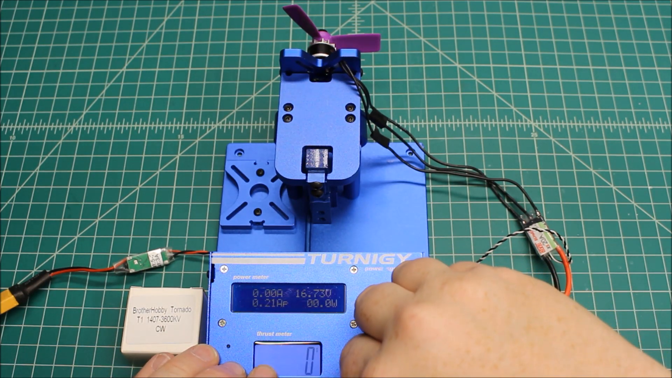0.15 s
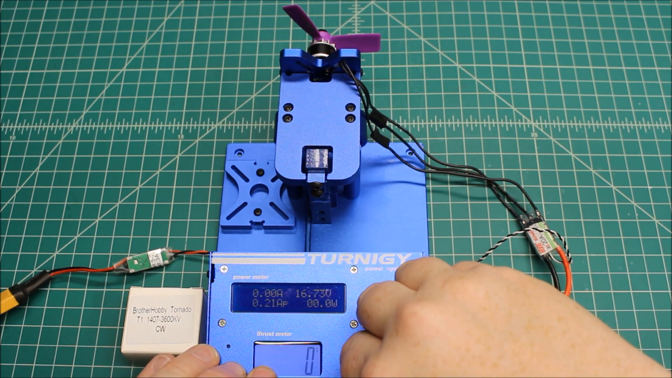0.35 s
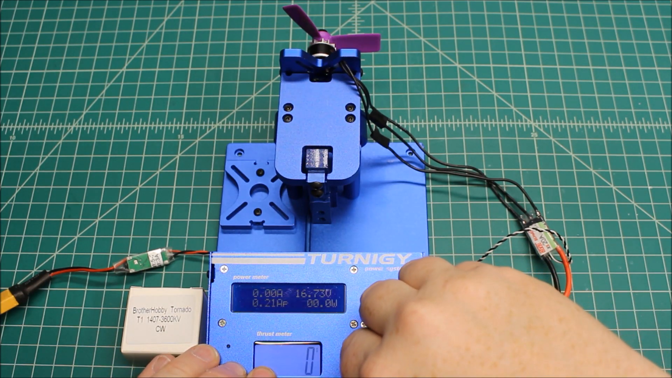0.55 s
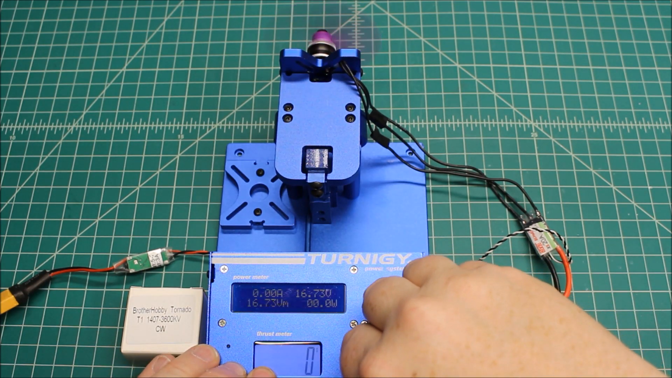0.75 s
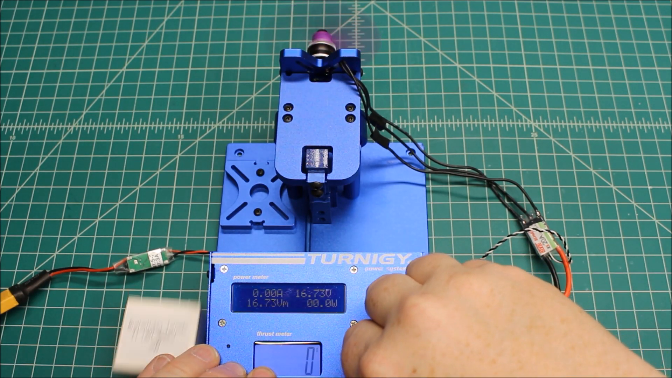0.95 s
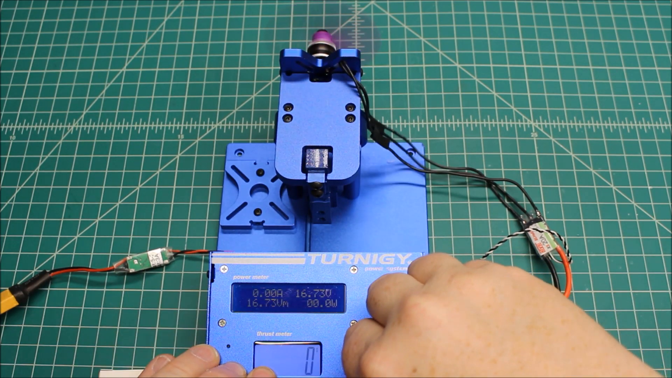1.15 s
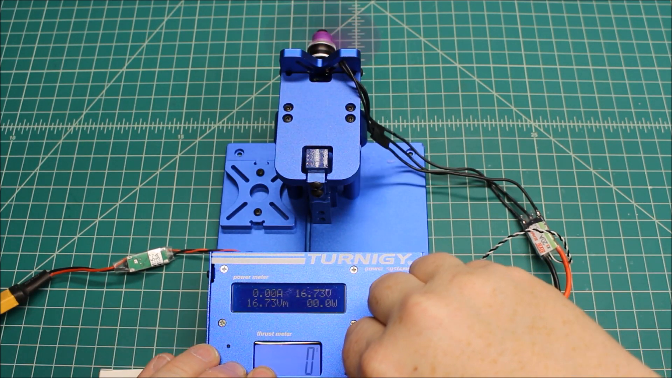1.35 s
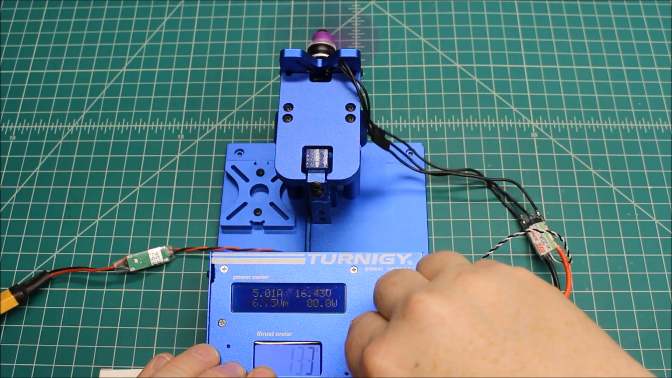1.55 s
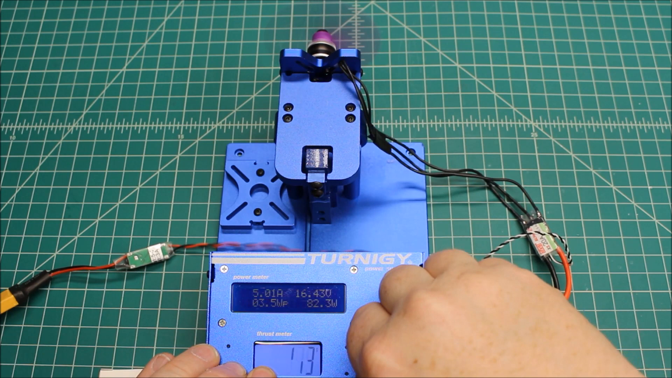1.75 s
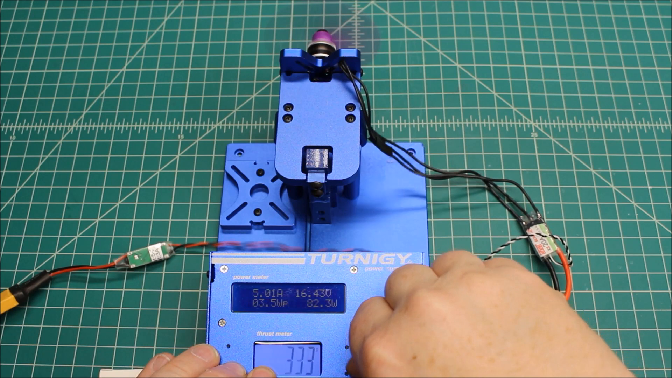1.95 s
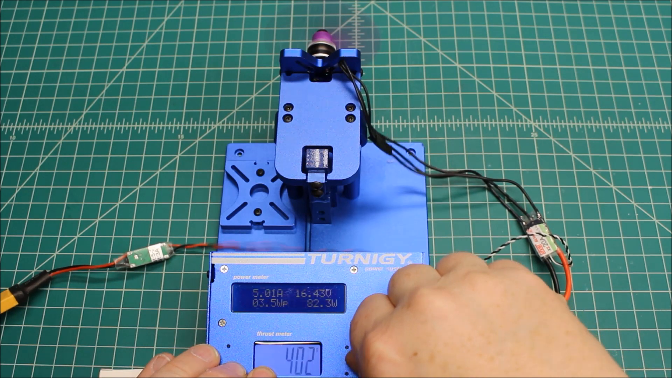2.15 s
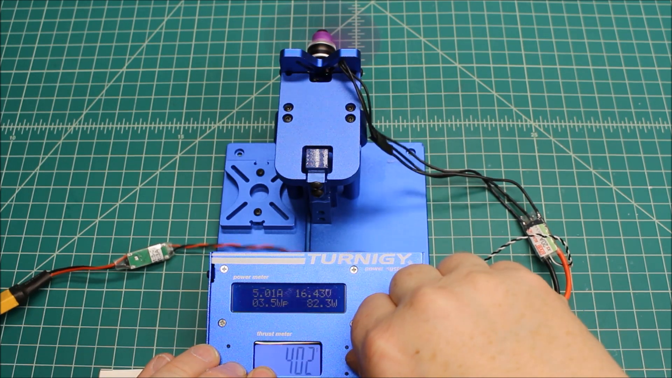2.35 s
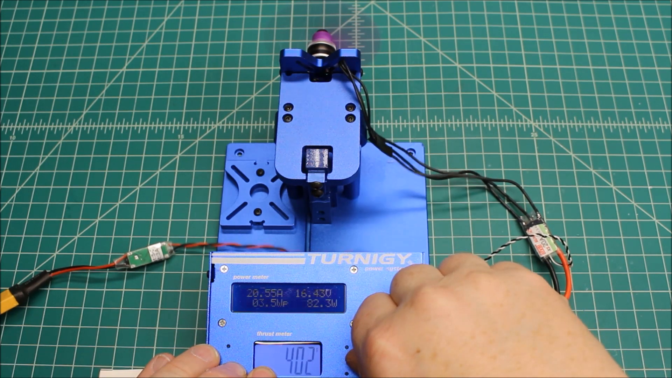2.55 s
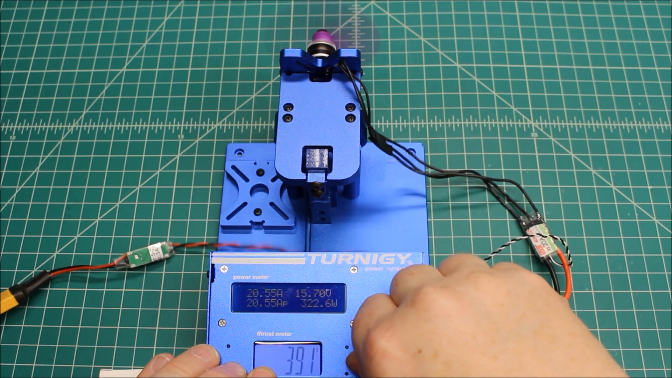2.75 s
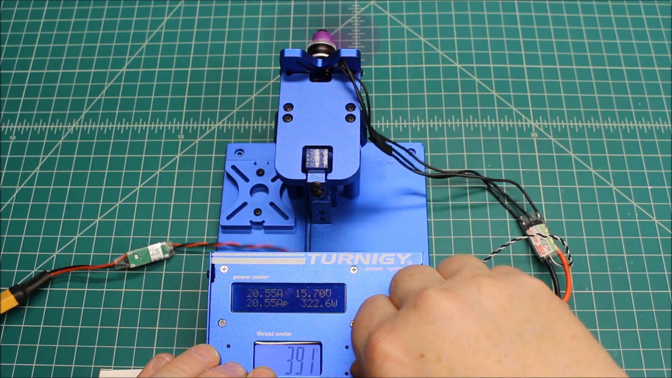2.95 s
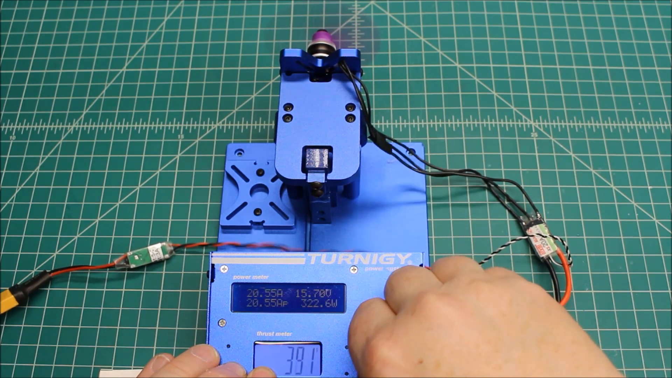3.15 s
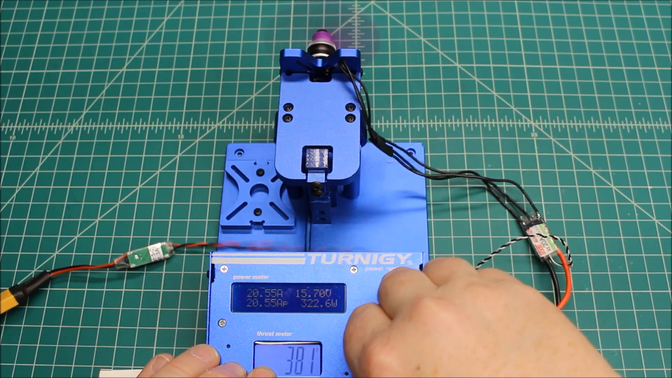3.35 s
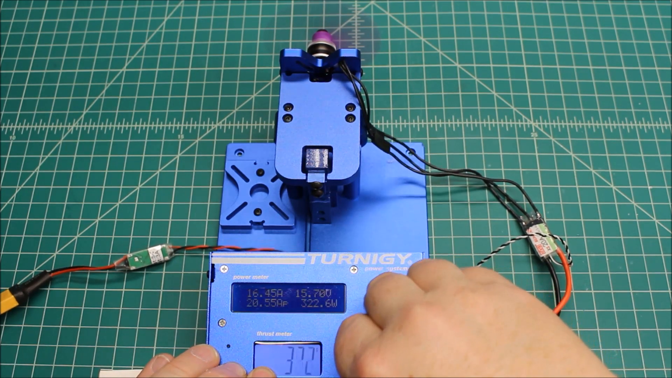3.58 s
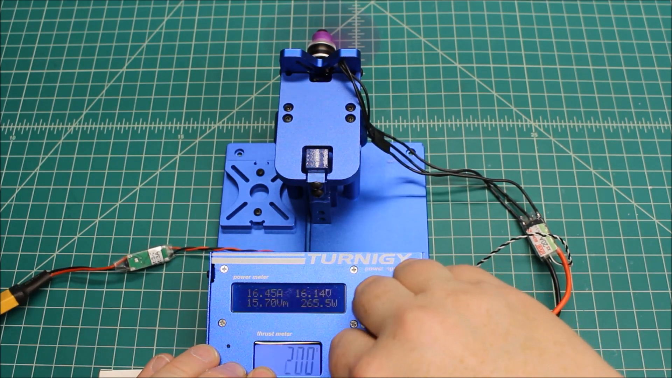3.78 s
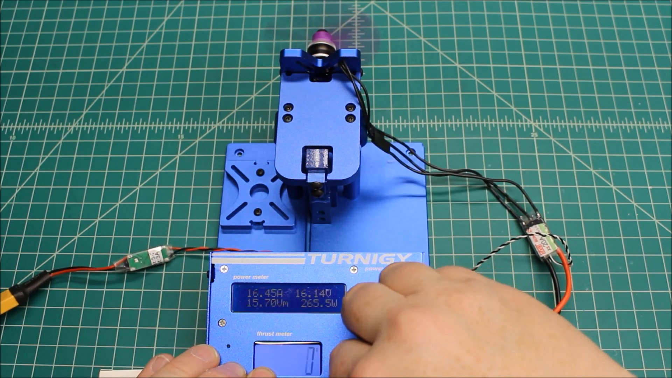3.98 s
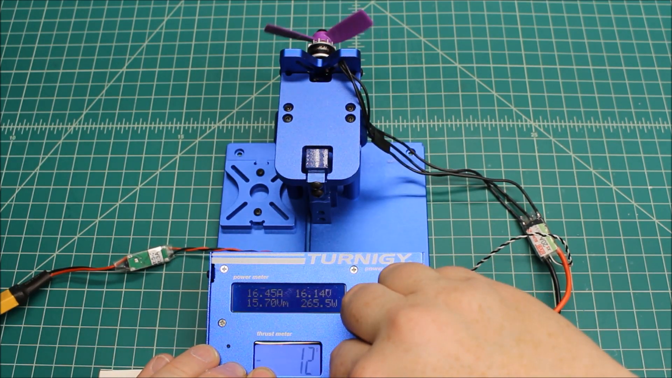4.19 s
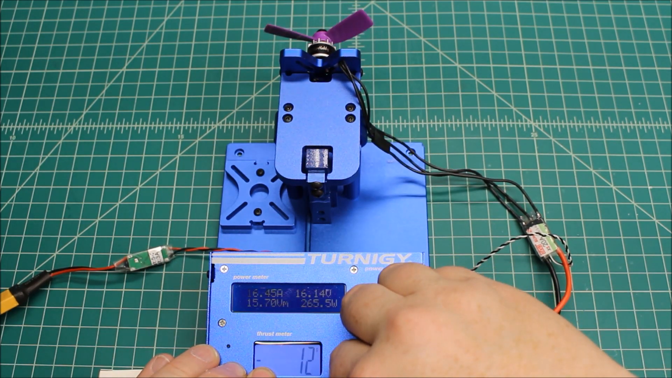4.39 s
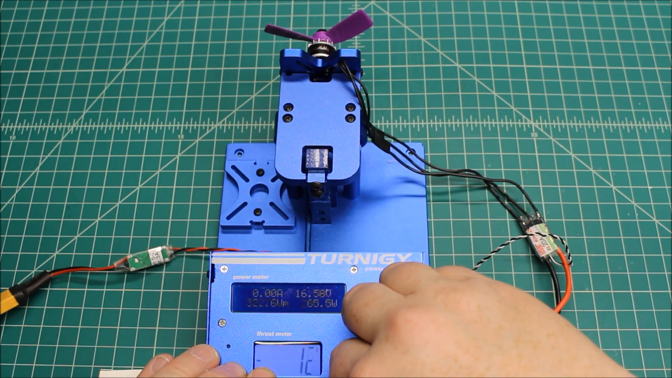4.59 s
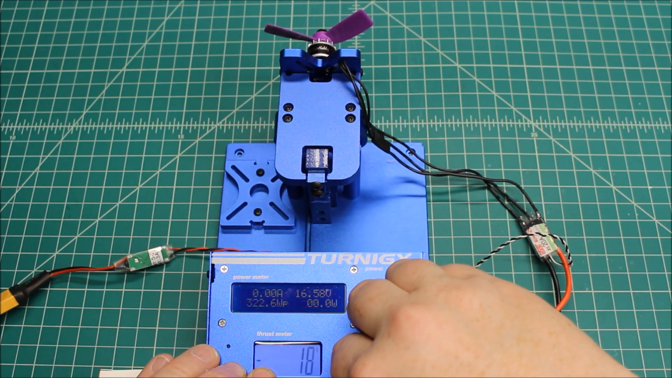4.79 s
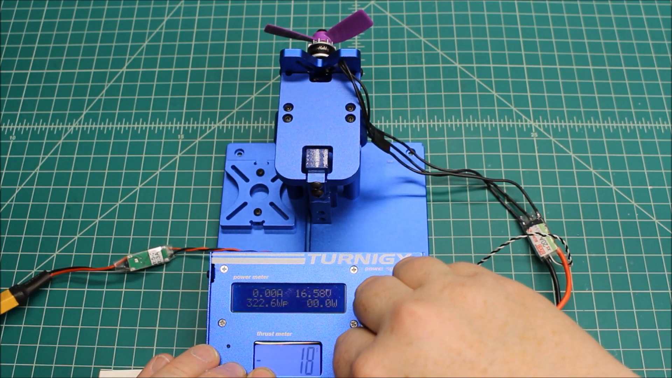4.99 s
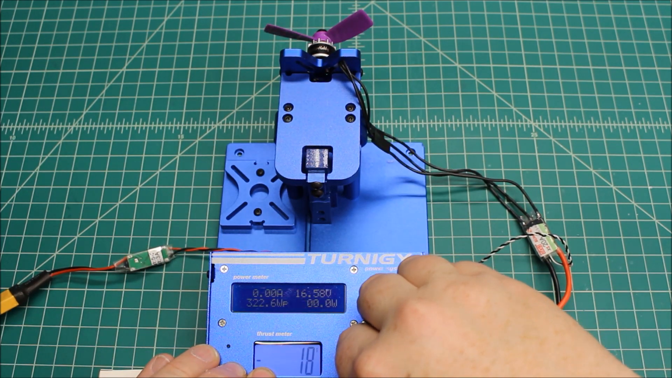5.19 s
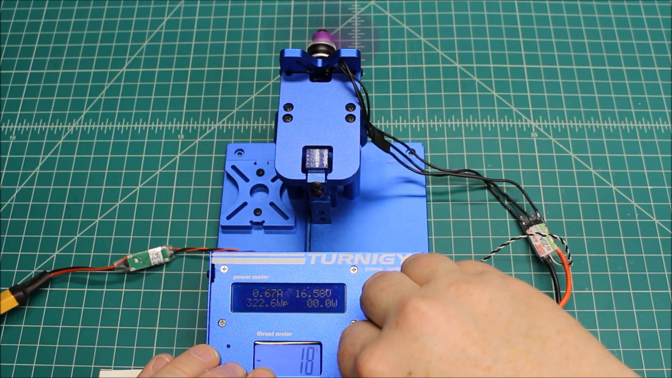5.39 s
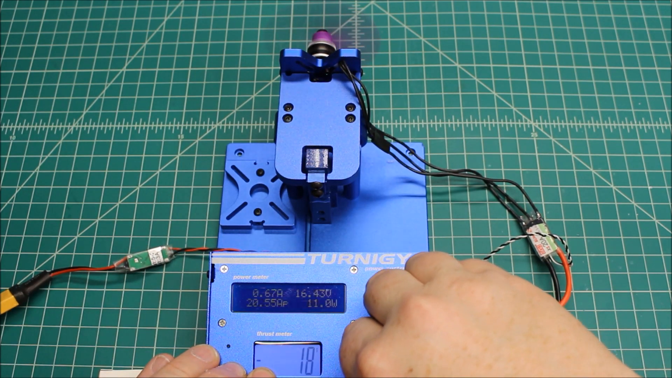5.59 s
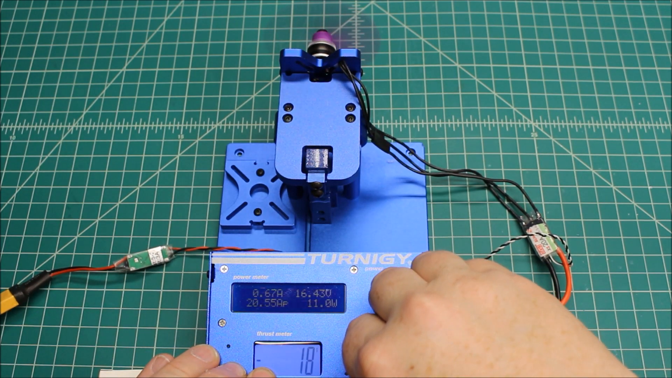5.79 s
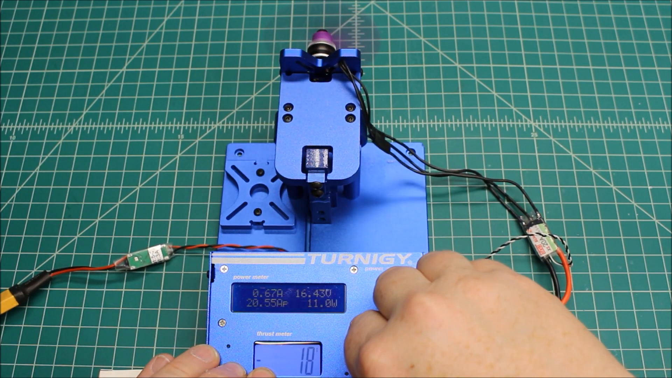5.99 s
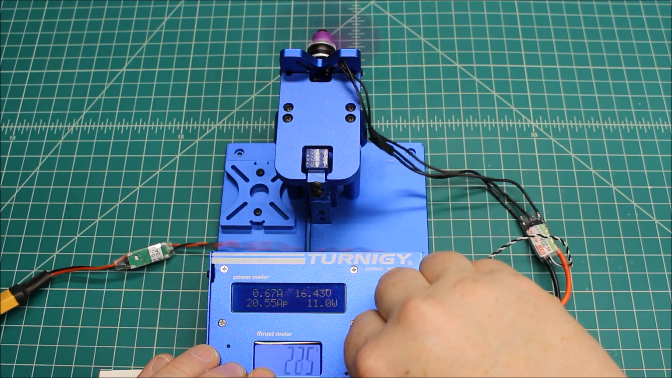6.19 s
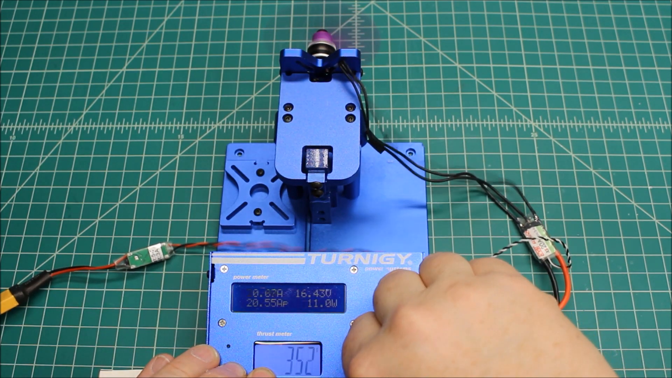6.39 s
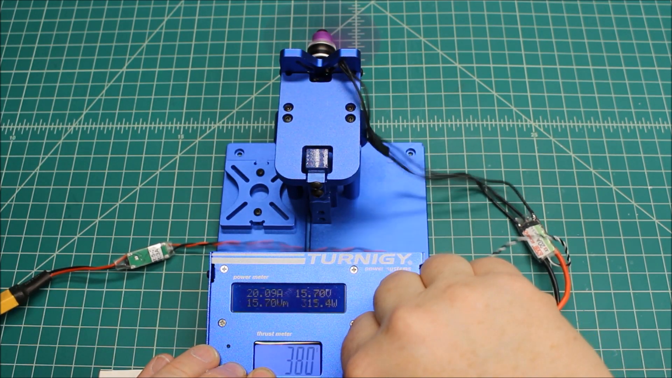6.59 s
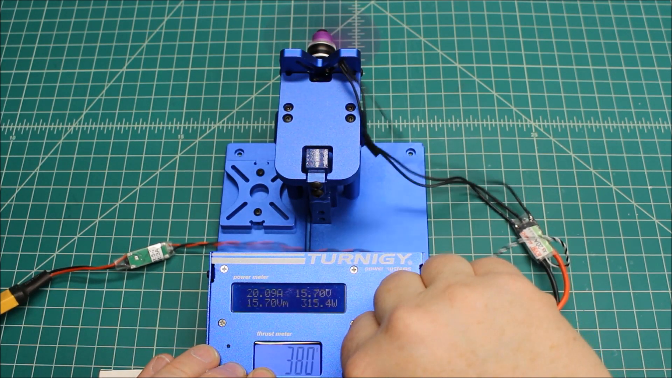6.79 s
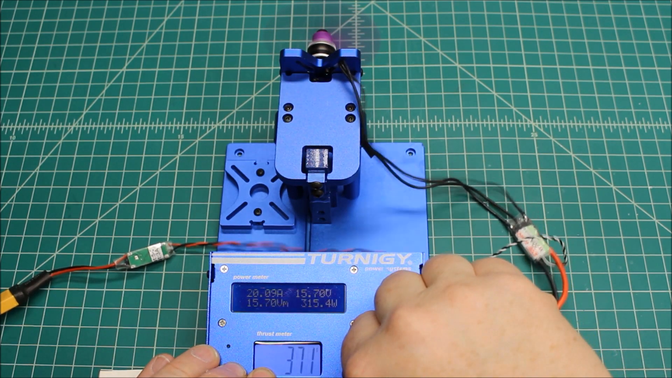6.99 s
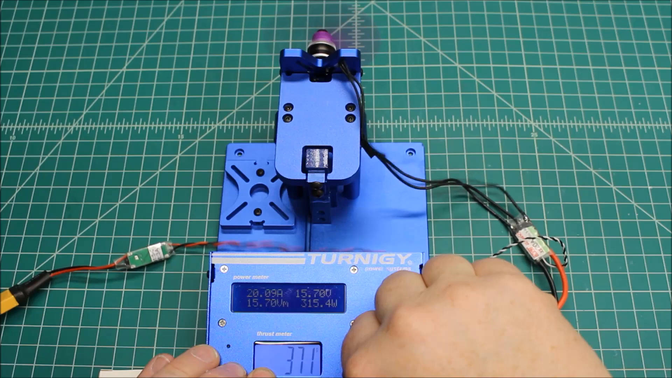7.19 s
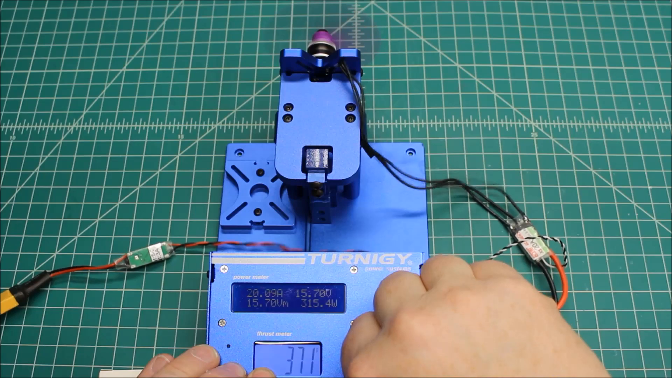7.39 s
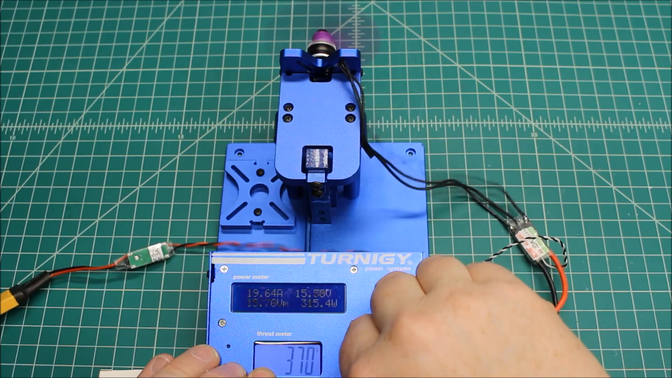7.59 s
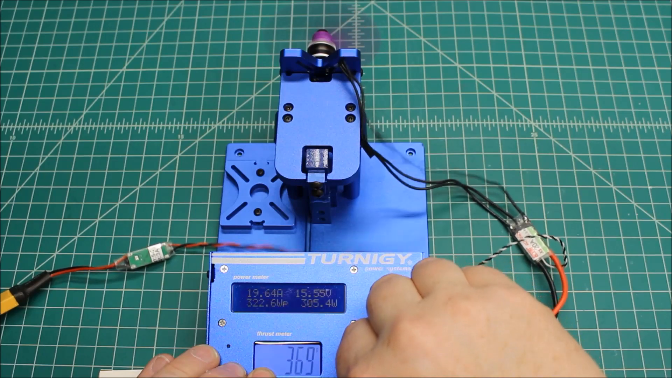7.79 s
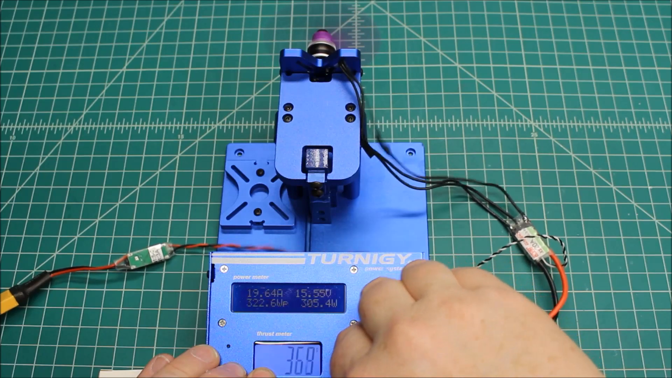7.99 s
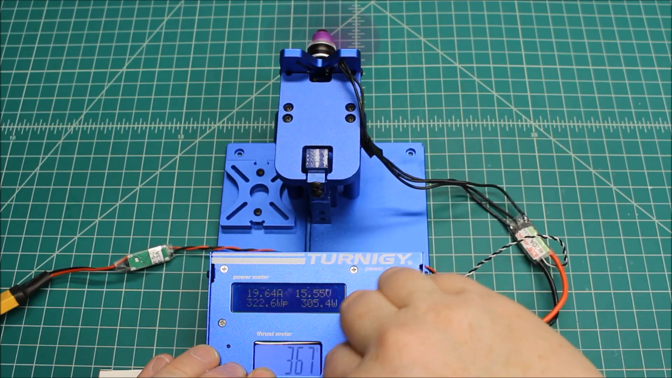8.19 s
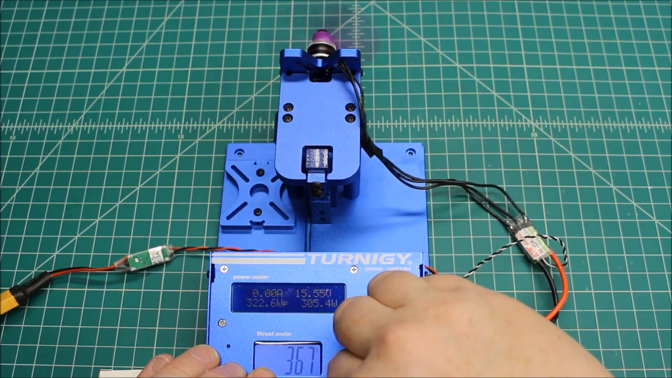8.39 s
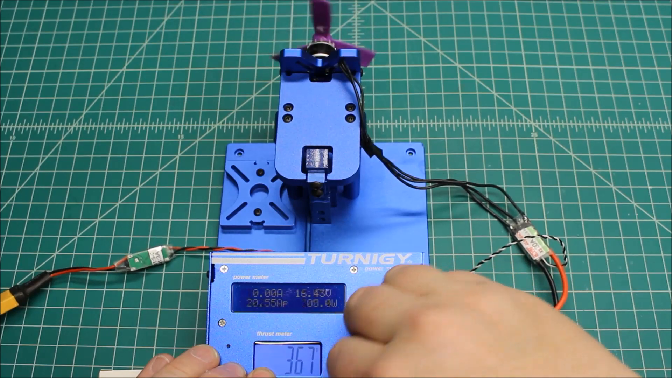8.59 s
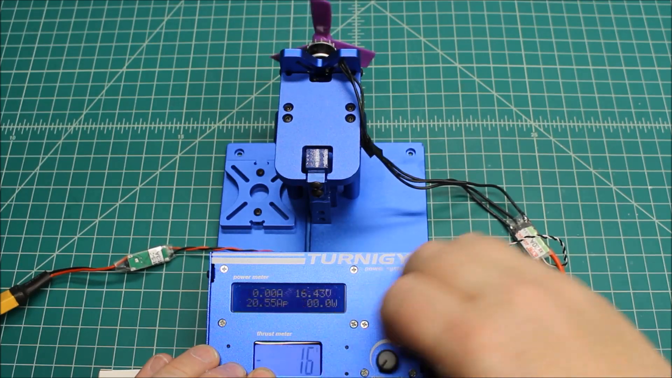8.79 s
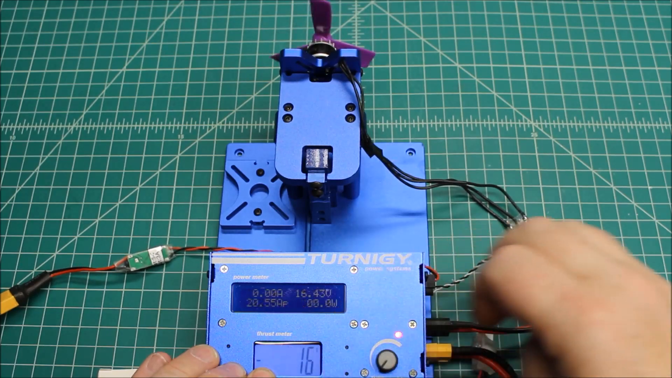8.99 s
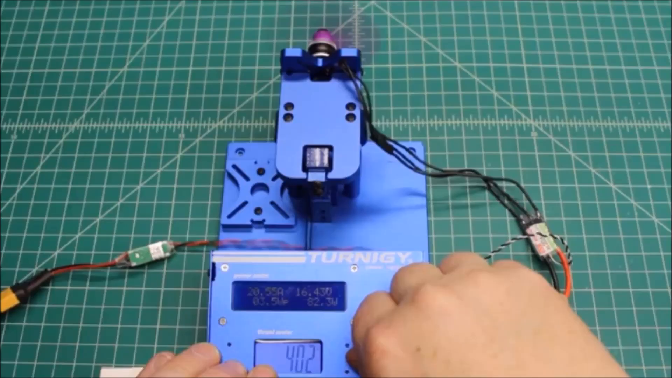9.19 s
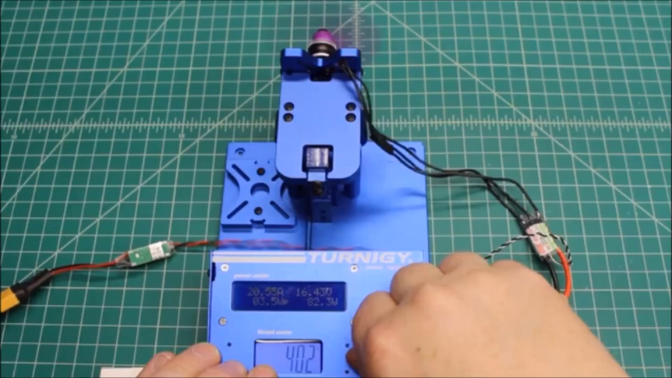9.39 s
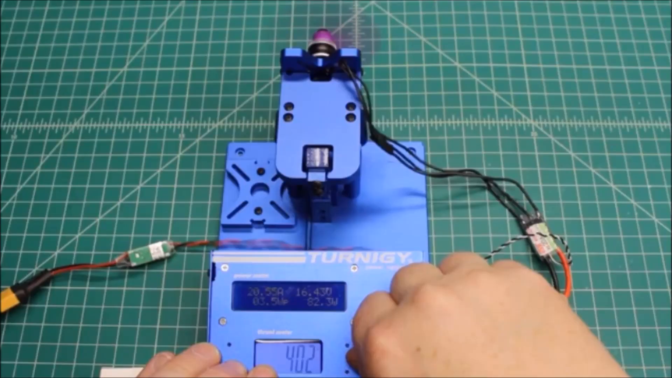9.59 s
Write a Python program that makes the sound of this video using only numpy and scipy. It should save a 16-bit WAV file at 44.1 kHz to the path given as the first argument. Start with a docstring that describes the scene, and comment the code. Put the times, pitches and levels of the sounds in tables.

```python
"""A faint hum fills a room; then a small motor judders, whines up to speed and winds down, twice.
It is a brushless motor turning a three-blade propeller on a bench thrust stand. At low speed its
magnetic whine sweeps through the notes at which the stand rings. At high speed the blades take over:
they whine at three times the shaft speed and chop eddies (swirls of air) into rough overtones,
over a rush of air."""
import sys
import numpy as np
from scipy import signal
from scipy.io import wavfile
from scipy.ndimage import uniform_filter1d

SR = 44100
rng = np.random.default_rng(int(sys.argv[2]) if len(sys.argv) > 2 else 0)


def output_pcm(signal):
    """Save a mono or channel-first signal as 16-bit PCM at the path in sys.argv[1].

    Samples are clipped to [-1, 1] before scaling.
    """
    pcm = np.clip(np.atleast_2d(signal).T, -1, 1) * 32767
    wavfile.write(sys.argv[1], SR, np.round(pcm).astype(np.int16))


N = 425565
TIME = np.arange(N) / SR
FULL_SPEED = 665  # shaft speeds are in turns per second
BLADES, WHINE_PER_TURN = 3, 36

# The room's hum. Each row: pitch in Hz, relative level in dB.
HUM_TONES = [(161.5, -75), (204.6, -81), (242.2, -76), (285.3, -80), (323.0, -82)]
# The tone colour of four noises. Each row: frequency in Hz, relative level in dB.
HISS_COLOUR = [(20, -4.5), (100, -2), (170, 1.5), (300, -3), (420, -6.5), (700, -10), (950, -12.5),
               (1400, -13), (16000, -15.5)]
BUFFET_COLOUR = [(20, 7), (42, 1), (70, -4), (120, -14), (200, -31), (400, -40.5), (1000, -65)]
RASP_COLOUR = [(150, -12), (500, -4), (1100, -11), (1800, -26.5), (2700, -3), (4100, -6.5), (5500, -1.5),
               (7100, 4.5), (9000, -6.5), (10300, 3), (11500, -4.5), (12600, -4), (14500, -12),
               (16000, -18.5)]
RUSH_COLOUR = [(100, -3.5), (200, -5), (450, -9), (700, 3.5), (1000, -0.5), (1700, 1.5), (3000, -1.5),
               (4400, -3.5), (7200, 2.5), (8700, -7), (11000, 0.5), (12500, -8.5), (14500, -3.5),
               (16000, -15)]
# Echoes that keep circling the room. Each entry: delay in seconds.
ROOM_DELAYS_S = [.0113, .0149, .0181, .0227, .0263, .0311, .0359, .0419]
# Single echoes off bench and walls. Each entry: delay in seconds.
ECHO_DELAYS_S = [.0031, .0074, .0127, .0193, .0281, .0397]
# Pitches the room boosts or weakens. Each row: pitch in Hz, reach to either side in Hz, gain in dB.
STANDING_WAVES = [(664, 3, -4), (674, 6, 3), (1100, 110, -4), (1945, 5, 4), (1955.5, 3, -7.5),
                  (1966, 6, -3), (1980, 5, 2.5), (2005, 4, 2.5), (2014, 4, -11), (3897, 14, -8),
                  (3945, 10, 8), (4042, 24, 8), (5800, 45, -5)]
# One gust as the draught sweeps a card off the bench: start in seconds, length in seconds, level in dB.
GUST = (1.12, 0.22, -46)
# The throttle knob is turned up by hand, one list a run. Each point: time in seconds, turns per second.
SPIN_UPS = [
    [(0.779, 14.0), (0.854, 126.3), (0.958, 225.9), (1.062, 304.6), (1.207, 374.3), (1.485, 431.6),
     (1.604, 494.8), (1.788, 667.8), (1.856, 678.2)],
    [(5.346, 14.0), (5.404, 137.4), (5.473, 221.4), (5.535, 268.4), (5.691, 346.5), (5.822, 449.6),
     (5.991, 536.9), (6.203, 653.5), (6.262, 662.0)],
]
# The two runs, with times in seconds. Each row: drive on, turns per second it sags toward, settling time,
# throttle starts closing, bend of that fall as an exponent, coasting starts, drive off.
RUNS = [(.76, 645.8, 1.33, 3.401, 1.35, 3.86, 4.135), (5.31, 633.3, 2.06, 7.952, 1.78, 8.292, 8.57)]
# How loudness follows speed. Each row: turns per second, then rush, rasp and magnetic whine in dB.
LEVELS_BY_SPEED = [(0, -110, -105, -100), (12.8, -105, -94, -70), (60.5, -64, -85, -55.5),
                   (135, -56, -51.5, -51), (195, -70, -46.5, -48.5), (281.5, -48, -40.5, -50.5),
                   (403.7, -36.5, -43.5, -46), (505, -30.5, -34.5, -63.5), (666, -24, -35, -62.5)]
# The controller kicks the rotor into motion. Each row: start in seconds, relative level in dB.
START_KICKS = [(.754, -64), (.785, -53.5), (5.295, -70), (5.329, -46.5)]
# The magnets' pull. Each row: multiple of the shaft speed, relative level in dB.
MAGNET_TONES = [(12, -5), (14, -14.5), (24, -20.5), (36, 7), (42, -44)]
# The stand's buzz: centre and reach in turns per second, level in dB, change per overtone in dB.
STAND_BUZZ = (66, 7, -52, -10)
# Resonances, the notes at which things ring. Each row: pitch in Hz, width in Hz, gain in dB.
STAND_RESONANCES = [(560, 240, -4.5), (1008, 50, 4), (1756, 130, 2), (2190, 36, 6.5), (2450, 370, 2.5),
                    (3420, 970, 1.5), (5200, 400, -3), (7100, 510, 7.5), (8040, 900, -5.5),
                    (9750, 420, 8.5), (10900, 300, 0)]  # broad, in the stand
METAL_RESONANCES = [(510, 7, 12), (2620, 22, 9), (4520, 14, 8), (9770, 30, 23)]  # longer ringing, in the blades and the motor's bell
HOLLOW_RESONANCES = [(978, 9, 4.5)]  # a hollow of the stand in the air stream
# The tone colour of the chopped air. Each row: frequency in Hz, relative level in dB.
CHOP_COLOUR = [(1000, -10), (2000, -14), (3000, -10.5), (4000, -18), (5200, -4.5), (6400, -8), (7600, 0.5),
               (8900, -9.5), (10000, -5.5), (12000, -11), (14000, -15), (16000, -23)]
# Large eddies drawn through the propeller. Each row: start in seconds, length in seconds, boost in dB.
LARGE_EDDIES = [(1.018, 0.27, 8), (1.248, 0.3, 5), (2.1, 0.075, 1)]
# Extra tones from unequal blades. Each row: multiple of the shaft speed, base level in dB at full speed.
IMBALANCE_TONES = [(1, -31), (2, -57), (4, -36.5), (5, -47), (7, -47), (9, -32)]
# The main whine. Each row: multiple of the rate at which blades pass, base level in dB at full speed,
# growth in dB per decade (a tenfold rise in speed).
BLADE_TONES = [(1, -17, 91.5), (2, -30.5, 101)]


def from_db(db):
    """Turns decibels into a plain multiplier."""
    return 10 ** (np.asarray(db) / 20)


def unit_level(x):
    """Scales a signal to an average (root mean square) level of 1."""
    return x / np.sqrt(np.mean(np.abs(x) ** 2) + 1e-20)


def look_up(rows, at):
    """Finds a value in a table's first column and reads off the others, blending between rows."""
    first, *columns = np.transpose(rows)
    return [np.interp(at, first, column) for column in columns]


def colour_at(colour, hz):
    """The level of a tone colour at a frequency, in dB."""
    known_hz, level_db = np.transpose(colour)
    return np.interp(np.log(np.maximum(hz, 1)), np.log(known_hz), level_db)


def drift(rate_hz, passes=2):
    """A random wander of typical size 1, made by smoothing noise."""
    memory = np.exp(-2 * np.pi * rate_hz * 20 / SR)
    slow = rng.standard_normal(N // 20 + 4002)  # one value every 20 samples
    for _ in range(passes):
        slow = signal.lfilter([1 - memory], [1, -memory], slow)
    slow = slow[4000:]  # skip the part where the smoothing settles
    return np.interp(np.arange(N) / 20, np.arange(len(slow)), unit_level(slow))


def noise(colour):
    """Noise of level 1, given its tone colour band by band."""
    edges = np.r_[np.geomspace(18, 2000, 14)[:-1], np.geomspace(2000, 17000, 16)]
    white, out = rng.standard_normal((2, N)), 0
    for k, (low, high) in enumerate(zip(edges, edges[1:])):
        band = signal.sosfilt(signal.butter(2, [low, high], "band", fs=SR, output="sos"), white[k % 2])
        out += from_db(colour_at(colour, np.sqrt(low * high))) * band
    return unit_level(out)


def resonate(force, resonances):
    """A shaken object rings at several of its own notes at once."""
    out = 0
    for k, (hz, width_hz, db) in enumerate(resonances):
        decay = np.exp(-np.pi * width_hz / SR)
        poles = [1, -2 * decay * np.cos(2 * np.pi * hz / SR), decay ** 2]
        ring = signal.lfilter([1, 0, -1], poles, force + 1e-18)
        out += (-1) ** k * from_db(db) * (1 - decay ** 2) / 2 * ring
    return out


def swell(start_s, length_s):
    """A quick rise from 0 to 1 and a slower fall back."""
    return np.sin(np.pi * np.sqrt(np.clip((TIME - start_s) / length_s, 0, 1)))


def decades(speed):
    """Speed in tenfold steps: 0 at full speed, -1 at a tenth of it."""
    return np.log10(speed / FULL_SPEED + 1e-6)


def background(hum_boost_db=0.5, hiss_db=-67, waver=.25):
    """A wavering low hum over faint hiss."""
    hum = sum(from_db(db) * np.sin(2 * np.pi * hz * TIME + drift(2)) * (1 + waver * drift(5.7))
              for hz, db in HUM_TONES)
    return np.sqrt(2) * from_db(hum_boost_db) * hum + from_db(hiss_db) * noise(HISS_COLOUR)


def room_echoes(x, fade_s=0.5, wall_hz=8000):
    """Sound bounces round a small room, quieter and duller on every round."""
    out, dull = np.zeros(N), np.exp(-2 * np.pi * wall_hz / SR)
    for k, delay_s in enumerate(ROOM_DELAYS_S):
        lag, loop, state = round(delay_s * SR), x.copy(), [0.]
        gain = from_db(-60 * delay_s / fade_s)
        for i in range(lag, N, lag):
            bounce, state = signal.lfilter([gain * (1 - dull)], [1, -dull], loop[i - lag:i], zi=state)
            loop[i:i + lag] += bounce[:N - i]
        out += (loop - x) * (-1) ** k
    return out


def standing_wave_db(hz, build_up_s=.04):
    """The room's standing waves make a tone swell or fade as its pitch moves through them."""
    gain_db = sum(db * np.exp(-((hz - centre) / reach) ** 2) for centre, reach, db in STANDING_WAVES)
    return uniform_filter1d(gain_db, int(build_up_s * SR))


def warble(x, speed, echo_db):
    """While the pitch slides, echoes arrive at an older pitch and beat against the direct sound."""
    speed_change = np.abs(np.gradient(speed)) * SR
    sliding = uniform_filter1d(np.clip(speed_change / 250 - .15, 0, 1), SR // 20)
    gain = from_db(echo_db) * sliding * np.clip(speed / 60, 0, 1) ** 2
    echoes = sum(np.pad(x, (round(delay_s * SR), 0))[:N] for delay_s in ECHO_DELAYS_S)
    return (x + gain * echoes) / np.sqrt(1 + len(ECHO_DELAYS_S) * gain ** 2)


def draught(speed, full_speed_db=-39.5, db_per_decade=54.5, travel_s=.11, lumpy_db=3.0):
    """The propeller's wind reaches the microphone a little late and buffets it."""
    earlier_speed = np.interp(TIME - travel_s, TIME, speed)
    wind = from_db(full_speed_db + db_per_decade * decades(earlier_speed))
    start_s, length_s, gust_db = GUST
    gust = from_db(gust_db) * swell(start_s, length_s)
    return noise(BUFFET_COLOUR) * (wind + gust) * from_db(lumpy_db * drift(10))


def shaft_speed(crawl_speed=14.1, coast_speed=100, coast_decay_s=.112):
    """Each run: a crawl, the spin-up, a slow sag under load, the throttle closing, then coasting."""
    speed = np.zeros(N)
    for spin_up, (on_s, settled, settle_s, close_s, bend, coast_s, off_s) in zip(SPIN_UPS, RUNS):
        top_s, top_speed = spin_up[-1]
        sag = (top_speed - settled) * (1 - np.exp(-np.maximum(TIME - top_s, 0) / settle_s))
        driven = look_up(spin_up, TIME)[0] - sag
        closed = np.clip((TIME - close_s) / (coast_s - close_s), 0, 1) ** bend
        throttled = driven + closed * (coast_speed - driven)
        coasting = np.exp(-np.maximum(TIME - coast_s, 0) / coast_decay_s)
        drive_on = (TIME > on_s) & (TIME < off_s)
        speed += np.maximum(throttled * coasting, crawl_speed) * drive_on  # the controller holds a crawl
    return uniform_filter1d(speed, SR // 40).clip(0)


def braking(speed, full_loss_per_s=1700):
    """How hard the propeller is slowing, from 0 to 1."""
    return np.clip(-np.gradient(speed) * SR / full_loss_per_s, 0, 1)


def start_kicks(fade_s=0.05):
    """Each starting kick is a short judder of the rotor, the motor's spinning part."""
    judder = sum(from_db(db) * (TIME > start_s) * np.exp(-np.abs(TIME - start_s) / fade_s)
                 for start_s, db in START_KICKS)
    return judder * rng.standard_normal(N)


def stand_buzz(speed, angle):
    """Near one speed the magnetic whine makes the stand buzz, which adds overtones to the whine."""
    centre, reach, buzz_db, step_db = STAND_BUZZ
    overtones = sum(from_db(k * step_db) * np.sin((k + 2) * WHINE_PER_TURN * angle) for k in range(4))
    return from_db(buzz_db) * np.exp(-((speed - centre) / reach) ** 2) * overtones


def motor(speed, angle, rasp_db, whine_db, roughness=0.69, throb=0.19, grit_db=-9.0, knock_db=-8.0):
    """Magnets passing the coils shake the stand; bearings rasp once a turn and keep the metal ringing."""
    pull = sum(from_db(db) * np.sin(k * angle) * audible(k * speed) for k, db in MAGNET_TONES)
    pull *= from_db(whine_db) * (1 + roughness * drift(150))
    grit = from_db(whine_db + grit_db) * np.clip(speed / 120, 0, 1) * rng.standard_normal(N)
    kicks, buzz = start_kicks(), stand_buzz(speed, angle)
    whine = resonate(pull + from_db(knock_db) * kicks, STAND_RESONANCES) + buzz
    ringing = resonate(pull + grit + kicks + buzz, METAL_RESONANCES)
    rasp = noise(RASP_COLOUR) * from_db(rasp_db) * (1 + throb * np.cos(angle))
    return whine + ringing + rasp


def audible(hz):
    """Fades a tone out as it climbs beyond hearing."""
    return np.clip((18000 - hz) / 2000, 0, 1)


def rushing_air(angle, rush_db, throb=0.26, flicker_db=0.96):
    """Churning air leaves the blades, pulsing as each one passes; it rings faintly in the stand."""
    air = noise(RUSH_COLOUR)
    level = from_db(rush_db + flicker_db * drift(28))
    pulse = 1 + throb * np.cos(BLADES * angle)
    return (air + resonate(air, HOLLOW_RESONANCES)) * level * pulse


def chopped_eddies(speed, angle, base_db=-19.5, db_per_decade=69.5, wake_db=6.5, burst_db=2.0):
    """Blades slice passing eddies; small eddies pass fast, so higher overtones waver faster."""
    out, pace = 0, np.maximum(speed / FULL_SPEED, 1e-2)
    flow_time = np.cumsum(np.sqrt(pace)) / SR  # eddies arrive more slowly at part speed
    for k in range(1, 11):
        hz, waver_hz = k * BLADES * speed, 2.7 * k ** 1.25
        eddy = drift(waver_hz, passes=1) + 1j * drift(waver_hz, passes=1)  # random strength and timing
        wave = np.real(np.interp(flow_time, TIME, eddy) * np.exp(1j * k * BLADES * angle))
        colour_db = colour_at(CHOP_COLOUR, hz) - 1.07 * k * (1 - pace)  # slower blades cut more softly
        out += from_db(colour_db + standing_wave_db(hz)) * audible(hz) * wave
    chop_db = base_db + db_per_decade * decades(speed)
    chop_db += wake_db * braking(speed)  # a slowing propeller cuts its own wake
    chop_db += sum(db * swell(start_s, length_s) for start_s, length_s, db in LARGE_EDDIES)
    inflow = np.clip((speed - 225) / 80, 0, 1)  # a slow propeller draws in no eddies
    return out * inflow * from_db(chop_db + burst_db * drift(29))


def blade_whine(speed, angle, flutter=0.048, imbalance_db_per_decade=62, unload_db=-1):
    """The blades' steady push on the air makes a tone and its octave; unequal blades add more tones."""
    out, speed_decades = 0, decades(speed)
    braking_db = unload_db * braking(speed)  # a slowing propeller sheds its load
    for multiple, db, db_per_decade in BLADE_TONES:
        per_turn = multiple * BLADES
        level_db = db + db_per_decade * speed_decades + braking_db + standing_wave_db(per_turn * speed)
        out += from_db(level_db) * np.sin(per_turn * angle)
    for per_turn, db in IMBALANCE_TONES:
        level_db = db + imbalance_db_per_decade * speed_decades + standing_wave_db(per_turn * speed)
        out += from_db(level_db) * np.sin(per_turn * angle) * (1 + 2 * flutter * drift(25))
    return np.sqrt(2) * out * (1 + flutter * drift(30))


def scene():
    """One turning shaft drives blades, air and motor in a humming room; both channels are the same."""
    speed = shaft_speed()
    unsettled = np.clip((FULL_SPEED - 40 - speed) / 200, 0, 1)  # below full throttle the speed wanders
    wobble = .0004 * drift(12) + .006 * unsettled * drift(60)
    angle = 2 * np.pi * np.cumsum(speed * (1 + wobble)) / SR
    rush_db, rasp_db, whine_db = look_up(LEVELS_BY_SPEED, speed)
    blades = warble(blade_whine(speed, angle), speed, echo_db=-7.0)
    air = warble(chopped_eddies(speed, angle), speed, echo_db=-20) + rushing_air(angle, rush_db)
    metal = warble(motor(speed, angle, rasp_db, whine_db), speed, echo_db=-12.5)
    echoes = room_echoes(from_db(-20) * air + from_db(-19) * metal + from_db(-34) * blades)
    mono = blades + air + metal + echoes + draught(speed) + background()
    return np.array([mono, mono])


def record(dry):
    """Rounds off the highest peaks, stops the sound shortly before the end and cuts the top treble."""
    ceiling, end_s, cutoff_hz = .9, 9.18, 15720
    rounded = dry / (1 + (dry / ceiling) ** 6) ** (1 / 6)
    running = np.clip((end_s - TIME) * 100, 0, 1)
    treble_cut = signal.ellip(12, .1, 90, cutoff_hz, fs=SR, output="sos")
    return signal.sosfilt(treble_cut, rounded * running)


dry = scene()
out = record(dry)
output_pcm(out)
```